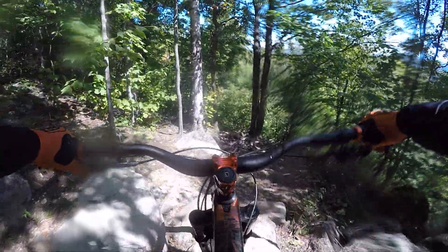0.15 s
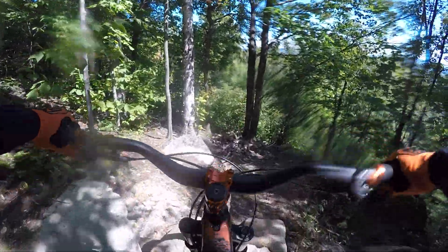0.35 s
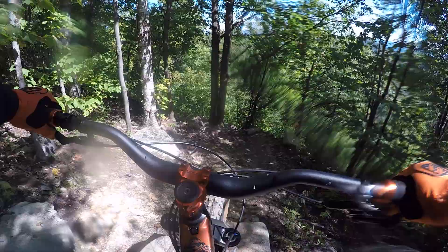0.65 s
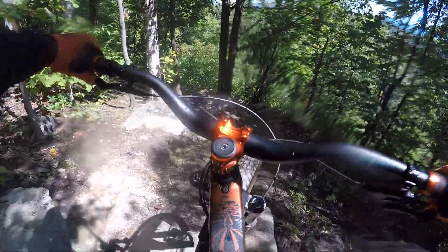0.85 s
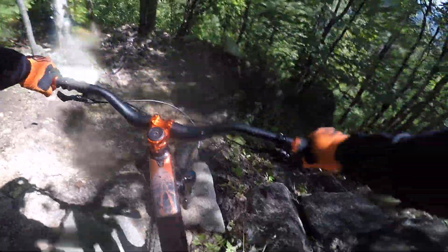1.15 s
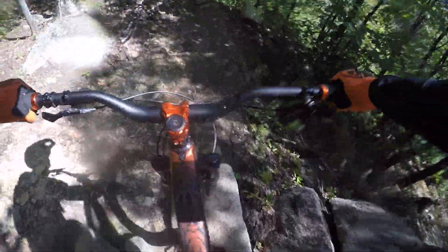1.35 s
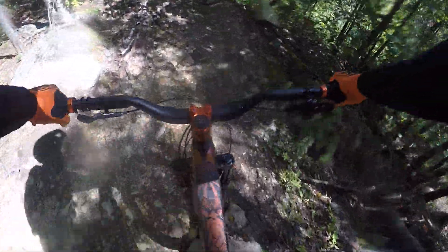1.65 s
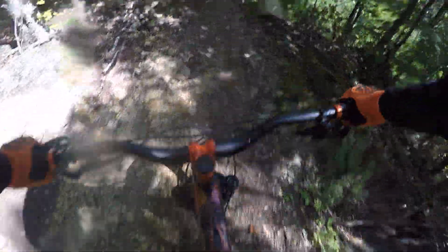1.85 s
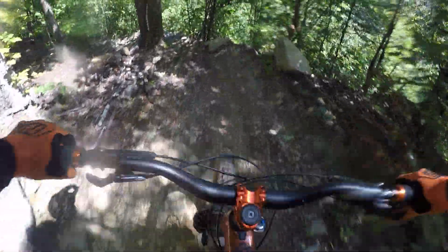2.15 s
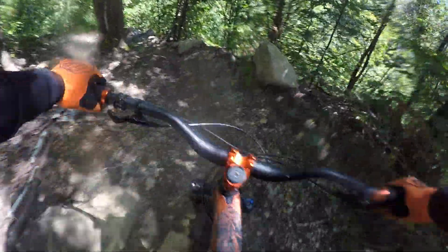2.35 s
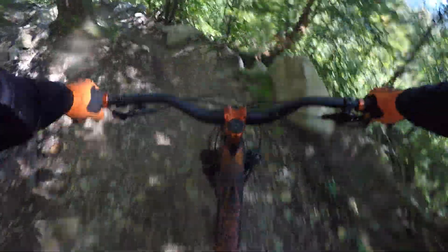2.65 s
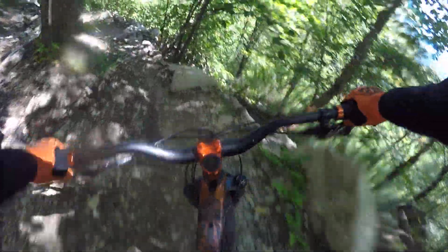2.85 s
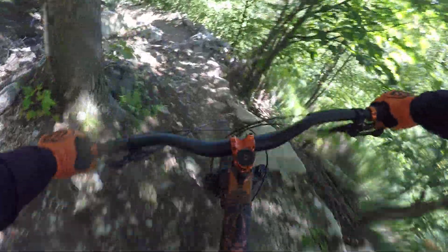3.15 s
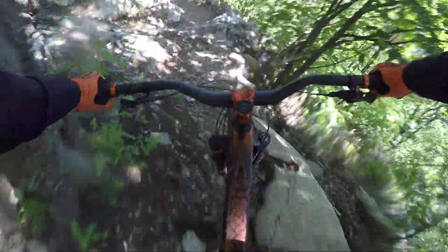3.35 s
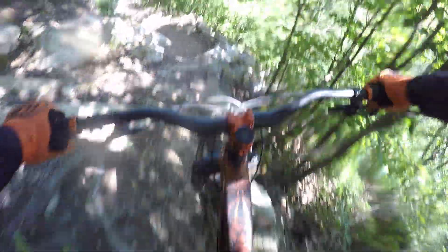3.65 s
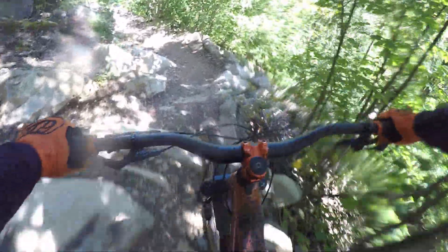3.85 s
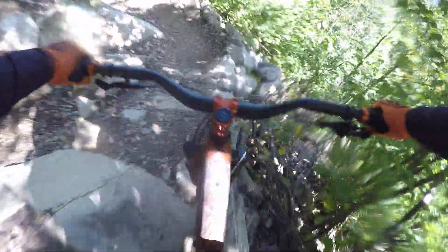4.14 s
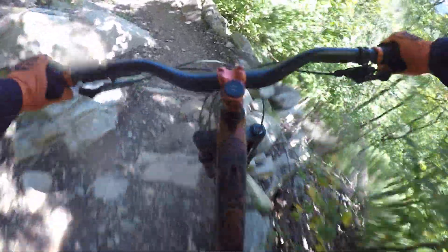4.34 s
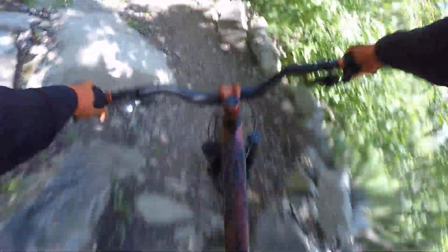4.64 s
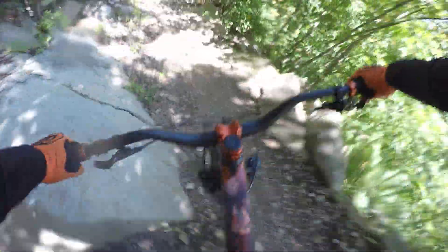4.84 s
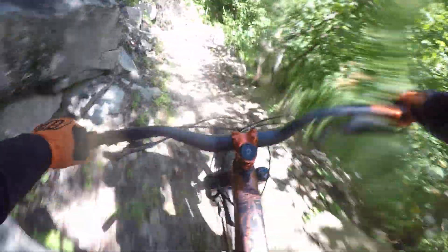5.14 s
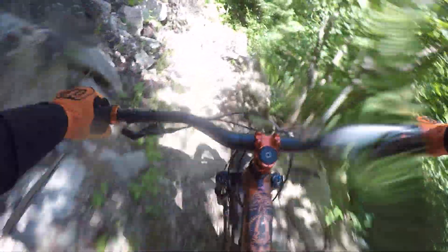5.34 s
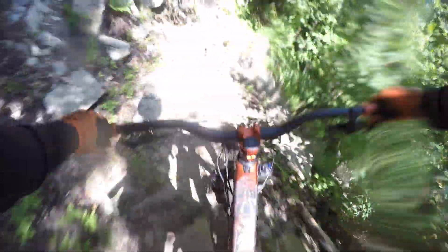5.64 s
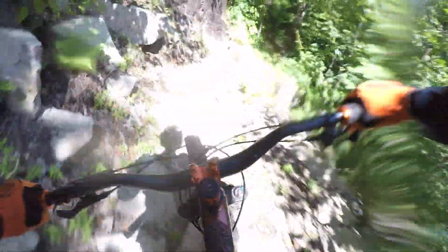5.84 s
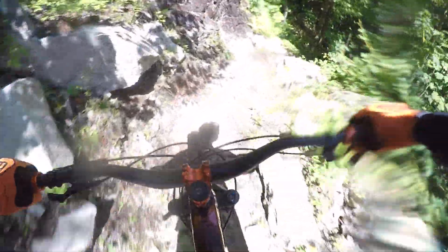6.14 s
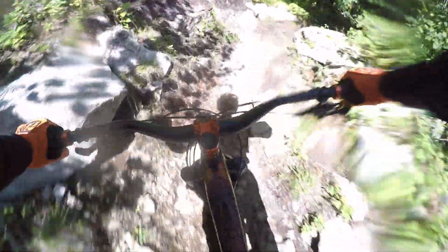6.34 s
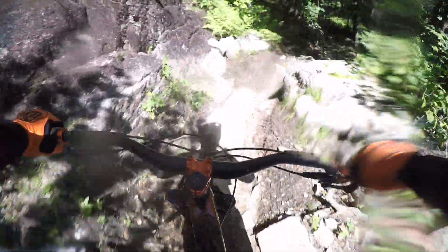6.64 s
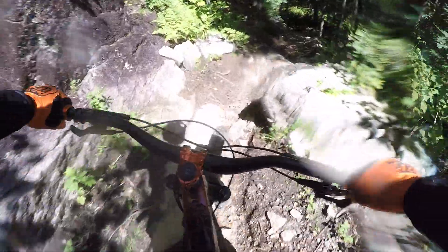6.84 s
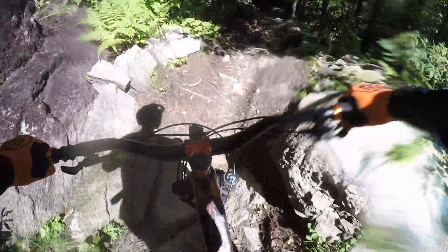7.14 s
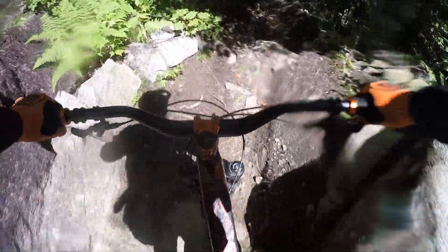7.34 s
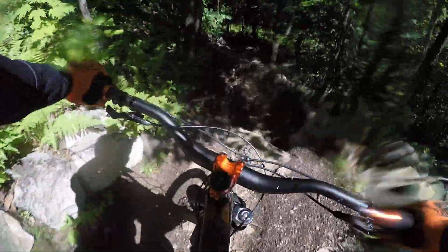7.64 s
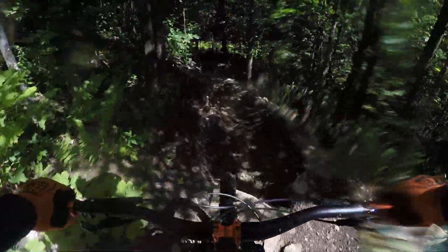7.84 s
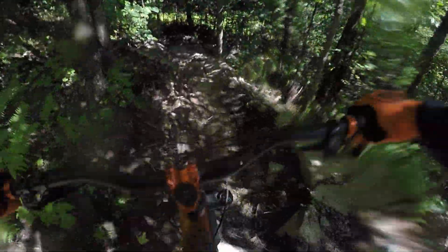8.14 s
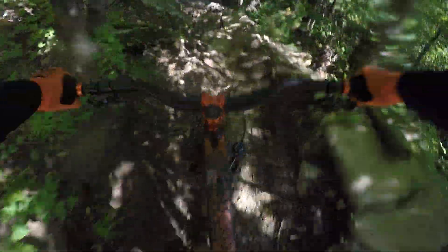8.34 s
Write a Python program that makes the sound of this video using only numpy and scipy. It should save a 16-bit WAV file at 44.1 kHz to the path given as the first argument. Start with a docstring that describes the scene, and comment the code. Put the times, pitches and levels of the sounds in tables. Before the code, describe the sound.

Wind rumbles and flutters on a microphone worn on the chest as a mountain bike crosses rocks and roots. Close hollow knocks and bright chain ticks ride over gritty tyre crunch and dragging disc brakes that squeal in short, piercing grabs. The brakes release briefly early on, then return. The rattling builds to a peak around halfway, then deep surges and a run of squeals lead to a final heavy swell.

```python
"""A mountain bike on a rocky forest trail, heard by a small camera strapped to the rider's chest.
From the start wind buffets the microphone, tyres crunch on grit and brake pads rub the disc. Frame
and chain clack, a low thump rings the camera housing, and the pads grip and slip in thin squeals.
The brake lets go at 1 s and is back by 1.7 s. The clatter is hardest near 5 s; deep swells of wind
rumble and a run of squeals follow, and the ride ends on one more big swell at 8.5 s."""
import sys
import numpy as np
from scipy.fft import rfft, irfft, next_fast_len
from scipy.io import wavfile
from scipy.ndimage import uniform_filter1d, map_coordinates

SR = 44100
rng = np.random.default_rng(int(sys.argv[2]) if len(sys.argv) > 2 else 0)


def dump(signal):
    """Clip the signal to [-1, 1] and save it as 16-bit WAV at the path in sys.argv[1]."""
    limited = np.clip(np.atleast_2d(signal).T, -1, 1)
    pcm = np.round(limited * 32767).astype(np.int16)
    wavfile.write(sys.argv[1], SR, pcm)


N = 374409


def amp(db):
    """Gain of a level in dB."""
    return 10 ** (np.asarray(db) / 20)


def unit(x):
    """x scaled to rms 1."""
    return x / np.sqrt(np.mean(x ** 2) + 1e-20)


def curves(rows):
    """Automation lanes: one value per sample for each column after the time."""
    times, *columns = np.transpose(rows)
    return [np.interp(np.arange(N) / SR, times, column) for column in columns]


def wobble(rate):
    """A smooth random modulator, rate knots a second."""
    knots = rng.standard_normal(int(N * rate / SR) + 4)
    return map_coordinates(knots, [np.arange(N) * rate / SR])


def filtered(x, response):
    """x through a complex frequency response."""
    size = next_fast_len(len(x) + 8192)
    return irfft(rfft(x, size) * response(np.fft.rfftfreq(size, 1 / SR)), size)[:len(x)]


def coloured(x, eq):
    """x through an EQ curve drawn on a log frequency axis, at rms 1."""
    hz, db = np.transpose(eq)
    return unit(filtered(x, lambda f: amp(np.interp(np.log(f + 1), np.log(hz + 1), db))))


def mode(f, centre_hz, width_hz):
    """One resonance, gain 1 at its centre."""
    return 1j * f * width_hz / (centre_hz ** 2 - f * f + 1j * f * width_hz)


def gritty(rate, spread_db, share):
    """Noise with rate sharp grains a second, which carry the given share of the power."""
    hits = rng.random(N) < rate / SR
    grains = hits * rng.standard_normal(N) * amp(spread_db * rng.random(N))
    return np.sqrt(share) * unit(grains) + np.sqrt(1 - share) * rng.standard_normal(N)


# Fader ride of the deep rumble: (time [s], level [dB])
RUMBLE_LEVEL = [(0.0, -35.5), (0.4, -26.5), (0.85, -34.5), (1.06, -25), (1.18, -38), (1.3, -14),
                (1.68, -29), (2.08, -13), (2.15, -38), (2.36, -18.5), (2.51, -26), (2.53, -11.5),
                (2.65, -16), (2.72, -29), (2.88, -25.5), (3.33, -29), (3.59, -14.5), (3.74, -26.5),
                (3.81, -18), (4.16, -25), (4.4, -17), (4.45, -22), (4.96, -10.5), (5.22, -23.5),
                (5.75, -13.5), (6.05, -20), (6.1, -31.5), (6.27, -19.5), (6.31, -44), (6.41, -5),
                (6.46, -20), (6.74, -17.5), (7.0, -24.5), (7.07, -15), (7.38, -22.5), (7.52, -10),
                (7.57, -24), (7.78, -11), (8.35, -28.5), (8.49, -8)]
# Sub-heavy EQ of the rumble: (frequency [Hz], relative gain [dB])
RUMBLE_EQ = [(4.7, 10.5), (8.0, -5.5), (21, 4.5), (32, 4.5), (110, -21), (140, -22.5), (240, -120)]

def wind_rumble():
    """Air and strap jolts push the microphone in a deep heave that surges at random."""
    deep = coloured(rng.standard_normal(N), RUMBLE_EQ)
    power = np.abs(uniform_filter1d(deep ** 2, size=5000))
    deep /= power ** 0.4 + 0.054  # the membrane's travel evens out the heave
    surges = amp(2.5 * wobble(rate=13))
    return amp(curves(RUMBLE_LEVEL)[0]) * unit(surges * deep)


# How hard the bike shakes; it also drives the tyres: (time [s], flutter level [dB])
SHAKE_LEVEL = [(0, -38), (.12, -51.5), (.6, -54), (.8, -49), (.92, -53), (1.14, -50.5), (1.22, -38),
               (1.34, -34.5), (1.47, -50.5), (1.74, -50.5), (1.82, -38.5), (1.9, -44.5), (1.96, -35.5),
               (2.08, -41.5), (2.17, -46), (2.45, -48), (2.57, -38.5), (2.75, -50.5), (3.33, -47.5),
               (3.55, -38.5), (3.85, -39.5), (3.95, -47), (4.15, -37.5), (4.5, -44.5), (4.8, -32.5),
               (4.88, -33), (4.95, -33.5), (5.1, -38), (5.2, -41.5), (5.45, -43.5), (5.55, -36),
               (5.75, -36), (6.1, -42.5), (6.3, -45.5), (6.55, -34.5), (6.85, -49.5), (7.05, -41),
               (7.3, -39.5), (7.55, -40), (7.8, -37), (8.1, -44.5), (8.33, -50), (8.49, -29.5)]
# Low-mid EQ of the flutter: (frequency [Hz], relative gain [dB])
FLUTTER_EQ = [(50, -74), (80, -33), (110, -7.5), (190, -8), (290, -9), (400, -18), (700, -27.5),
              (1500, -62.5)]

def flutter():
    """Buffeting above the rumble: a lumpy flutter that swells as the bike shakes."""
    lumps = amp(0.72 * wobble(13) + 3.7 * wobble(35))
    air = coloured(rng.standard_normal(N), FLUTTER_EQ)
    return amp(curves(SHAKE_LEVEL)[0]) * unit(lumps * air)


def gravel(rate, centre_hz, spread, decay_cycles, spread_db):
    """Loose stones under the knobs: short damped pings of scattered pitch and size."""
    count, n = int(rate * N / SR), np.arange(400)
    starts = (rng.random(count) * N).astype(int)
    pitch, size = rng.standard_normal((2, count, 1))
    hz = np.clip(centre_hz * np.exp(spread * pitch), 300, 9000)
    turns = hz * n / SR
    pings = amp(spread_db * size) * np.sin(2 * np.pi * turns) * turns * np.exp(-turns / decay_cycles)
    return unit(np.bincount((starts[:, None] + n).ravel(), pings.ravel())[:N])


TYRE_DB, CALM_SHAKE_DB = -47, -40.5  # the tyre fader sits at TYRE_DB for this much shaking

def tyre_level():
    """The tyre fader in dB: the harder the bike shakes, the higher it rides."""
    return TYRE_DB + 0.92 * (curves(SHAKE_LEVEL)[0] - CALM_SHAKE_DB)


# EQ of rubber crunching on grit: (frequency [Hz], relative gain [dB])
CRUNCH_EQ = [(200, -21), (400, 5.5), (700, -3), (1300, -5.5), (2500, -2.5), (4000, -8.5), (6000, -51),
             (10000, -67)]

def tyres(bumps):
    """Tyres crunch on grit in spurts; loose stones come forward as the ride gets rougher."""
    level_db = tyre_level()
    spurts = amp(1.2 * bumps + 1.6 * wobble(70))
    crunch = unit(spurts * coloured(gritty(rate=900, spread_db=8, share=0.21), CRUNCH_EQ))
    stones = gravel(rate=500, centre_hz=1294, spread=0.636, decay_cycles=1.7, spread_db=6)
    stones_db = 0.19 * (level_db - TYRE_DB)
    return amp(level_db - 6) * (crunch + amp(stones_db) * stones)


# Fader ride of the rolling hiss: (time [s], level [dB])
HISS_FADER = [(0, -63), (.3, -68.5), (.7, -57.5), (.9, -69), (1.15, -61), (1.9, -66.5), (2.4, -63.5),
              (2.75, -60.5), (3.6, -56), (4.2, -60.5), (4.96, -50.5), (5.5, -56), (7, -56), (7.5, -53.5),
              (8.15, -60), (8.49, -56.5)]
# EQ of the hiss, with a bright peak: (frequency [Hz], relative gain [dB])
HISS_EQ = [(2500, 2), (4500, 1.5), (6500, -0.5), (7450, 6), (8300, -6), (11000, -10.5), (14500, -13),
           (15300, -48)]

def rolling_hiss(bumps):
    """An airy hiss that flickers with the same bumps as the tyres."""
    flicker = amp(1.4 * bumps + 1.3 * wobble(60))
    hiss = coloured(rng.standard_normal(N), HISS_EQ)
    return amp(curves(HISS_FADER)[0]) * unit(flicker * hiss)


# Fader ride of the pads on the disc: (time [s], level [dB])
RUB_LEVEL = [(0, -54), (.15, -62), (.32, -55), (.6, -54.5), (.85, -57), (1, -92), (1.5, -80), (1.66, -53.5),
             (2, -53.5), (2.6, -51.5), (2.9, -47.5), (3.9, -48.5), (4.5, -49.5), (5.3, -50), (5.8, -46.5),
             (6.7, -55.5), (7.2, -51), (7.7, -51), (8.1, -55.5), (8.2, -48.5), (8.49, -54)]
# Low modes of the brake disc: (frequency [Hz], bandwidth [Hz], relative gain [dB])
DISC_MODES = [(1172, 18, 11), (1390, 85, 11), (1595, 117, 7), (2368, 73, 2), (2932, 49, 4), (3890, 76, -3),
              (4900, 25, -48)]

def brake_rub():
    """The pads drag on the disc and catch its low modes in short chirps."""
    drag = gritty(rate=400, spread_db=13, share=0.41)
    grip_db = 1.9 * wobble(40)
    disc = np.zeros(N)
    for hz, width_hz, db in DISC_MODES:
        chirp_db = 8000 / (hz + 400) * wobble(50)  # lower modes swing further in level
        disc += filtered(amp(db + grip_db + chirp_db) * drag, lambda f: mode(f, hz, width_hz))
    return amp(curves(RUB_LEVEL)[0]) * unit(disc)


def whine():
    """A faint, narrow, steady whine high in the background."""
    return amp(-79) * unit(filtered(rng.standard_normal(N), lambda f: mode(f, 5050, 60) ** 2))


def contacts(rows, relative_width, crunch_eq, crunch_db, fall_db):
    """Rattling bursts, each ringing at one pitch over a wider crunch; fall_db down after its length."""
    out, t = np.zeros(N + SR), np.arange(SR // 6) / SR
    for start, db, hz, length in rows:
        length = max(length, 0.002)
        attack = 1 - np.exp(-t / (0.00012 + 0.085 * length))
        decay = amp(-fall_db * (t / length) ** 2.3)
        noise = rng.standard_normal(len(t))
        rattle_db = 4 * np.repeat(rng.standard_normal(len(t) // 50 + 1), 50)[:len(t)]
        burst = filtered(noise * amp(rattle_db) * attack * decay,
                         lambda f: mode(f, hz, relative_width * hz) ** 2 + amp(crunch_db) * crunch_eq(f))
        rms = np.sqrt(np.sum(burst ** 2) / (length * SR))
        out[round(start * SR):][:len(t)] += amp(db) * burst / rms
    return out[:N]


def small_clacks(rate, ring_hz, length_s):
    """Cues for lesser knocks at scattered moments, around 3 dB under the tyre fader."""
    timing, strength, pitch, stretch = rng.standard_normal((int(N / SR * rate), 4)).T
    starts = np.clip((np.arange(len(timing)) + 0.5 + 0.4 * timing) / rate, 0, (N - 1) / SR)
    db = tyre_level()[(starts * SR).astype(int)] - 3 + 2 * strength
    return list(zip(starts, db, ring_hz * np.exp(0.24 * pitch), length_s * np.exp(0.34 * stretch)))


# Hits of frame and stones: (time [s], level [dB], ring pitch [Hz], length [s])
FRAME_HITS = [(0.007, -41, 1210, 0.022), (0.225, -42.5, 1250, 0.0055), (0.259, -44, 3000, 0.0037),
              (0.83, -53, 1510, 0.039), (0.298, -48, 2880, 0.0041), (0.405, -53.5, 4300, 0.016),
              (1.226, -47, 1720, 0.025), (1.273, -47, 1450, 0.03), (1.295, -42.5, 1640, 0.026),
              (1.185, -51, 1510, 0.035), (1.36, -50, 1270, 0.012), (1.41, -52, 1480, 0.028),
              (1.856, -43, 1770, 0.0099), (1.939, -44, 1830, 0.032), (2.548, -48, 980, 0.028),
              (2.694, -45, 1490, 0.026), (2.743, -29.5, 1570, 0.0041), (2.789, -46, 1500, 0.032),
              (2.18, -49, 1150, 0.024), (2.31, -52, 1170, 0.018), (2.41, -47, 1200, 0.013),
              (2.965, -47, 1480, 0.021), (2.99, -47, 1350, 0.016), (3.165, -48, 1570, 0.011),
              (3.32, -49, 1190, 0.017), (3.741, -43, 1300, 0.017), (3.851, -43.5, 1390, 0.014),
              (0.465, -60, 4640, 0.018), (6.456, -40, 750, 0.011), (7.03, -46.5, 1600, 0.018),
              (3.044, -44, 1580, 0.018), (3.266, -41, 1520, 0.0075), (3.478, -36.5, 1450, 0.0075),
              (3.505, -40.5, 1770, 0.011), (3.522, -40, 1470, 0.012), (3.678, -44, 1390, 0.013),
              (3.774, -43, 3220, 0.0057), (3.936, -41, 1500, 0.011), (3.95, -31.5, 1460, 0.0017),
              (4.151, -40.5, 3850, 0.011), (4.181, -40.5, 4000, 0.016), (4.232, -34, 1510, 0.031),
              (4.355, -43, 1550, 0.0077), (4.441, -39.5, 1440, 0.01), (4.477, -41.5, 3120, 0.014),
              (4.555, -37, 1200, 0.0062), (4.668, -36, 1370, 0.0052), (4.715, -38, 3120, 0.033),
              (4.779, -25, 980, 0.0025), (4.791, -28.5, 1600, 0.0066), (4.806, -29.5, 1160, 0.0062),
              (4.822, -28.5, 1840, 0.0035), (4.928, -31, 3120, 0.016), (4.942, -29, 1480, 0.0041),
              (4.962, -35.5, 3500, 0.012), (5.004, -35, 1470, 0.0067), (5.045, -38, 730, 0.0068),
              (5.08, -41.5, 1000, 0.044), (5.085, -43.5, 3180, 0.02), (5.168, -40, 1490, 0.018),
              (5.303, -42.5, 2590, 0.0081), (5.354, -38.5, 1550, 0.005), (5.458, -39.5, 1490, 0.008),
              (5.538, -31, 1300, 0.007), (5.647, -36, 1030, 0.025), (5.715, -27, 1500, 0.0026),
              (5.753, -34, 1610, 0.0066), (5.889, -37, 2290, 0.026), (6.205, -44.5, 2320, 0.018),
              (6.3, -40.5, 1380, 0.018), (6.39, -40, 2140, 0.029), (6.427, -34.5, 880, 0.0094),
              (6.536, -33.5, 2550, 0.0095), (6.605, -42, 1550, 0.0052), (6.642, -30.5, 1900, 0.013),
              (6.643, -36, 1040, 0.011), (7.063, -40, 3200, 0.008), (7.105, -37.5, 895, 0.0075),
              (7.172, -35.5, 2330, 0.0076), (7.221, -41, 1830, 0.028), (7.326, -38, 1400, 0.009),
              (7.411, -35, 2460, 0.023), (7.525, -39, 1820, 0.0054), (7.671, -36.5, 1700, 0.014),
              (7.747, -36.5, 1650, 0.0035), (7.843, -36, 1530, 0.011), (8.004, -44, 2070, 0.043),
              (8.052, -43.5, 2360, 0.0096), (8.158, -41.5, 2090, 0.022), (8.18, -44.5, 1400, 0.016),
              (8.35, -43.5, 1490, 0.0036), (8.376, -39, 1370, 0.015), (8.405, -41, 3140, 0.044)]

def frame_clacks():
    """Frame and stones knock with a hollow ring as the bike crosses rocks and roots."""
    hits = FRAME_HITS + small_clacks(rate=4, ring_hz=1610, length_s=0.016)
    return contacts(hits, relative_width=0.23, crunch_db=-3, fall_db=5,
                    crunch_eq=lambda f: mode(f, 804, 2170) ** 2 * mode(f, 1180, 4400))


# Hits of chain and cables: (time [s], level [dB], ring pitch [Hz], length [s])
CHAIN_HITS = [(0.135, -47, 6940, 0.0022), (0.42, -58, 7400, 0.003), (0.675, -55, 7400, 0.0022),
              (0.241, -53, 7300, 0.0049), (1.238, -47.5, 4930, 0.0043), (1.273, -48, 4960, 0.0055),
              (1.82, -40.5, 7300, 0.0021), (2.876, -53.5, 7400, 0.012), (3.367, -43.5, 6200, 0.0034),
              (3.419, -41, 7300, 0.0049), (3.565, -51.5, 7000, 0.019), (3.695, -52.0, 7060, 0.008),
              (3.949, -51, 6460, 0.0032), (4.153, -48, 7300, 0.004), (4.225, -51, 7350, 0.006),
              (4.233, -46, 4600, 0.0045), (4.247, -47, 7010, 0.01), (4.485, -42.5, 6250, 0.005),
              (4.732, -43, 7350, 0.0037), (4.823, -42, 5260, 0.0019), (4.943, -45, 4600, 0.0061),
              (4.966, -40, 5300, 0.0067), (4.983, -41, 6270, 0.008), (5.01, -43.5, 5150, 0.0057),
              (5.466, -47.5, 5770, 0.005), (5.651, -42.5, 4850, 0.017), (5.677, -50, 7270, 0.0049),
              (5.829, -47.5, 7300, 0.011), (5.994, -46, 4650, 0.0088), (6.374, -42.5, 5640, 0.015),
              (6.431, -45, 6300, 0.0032), (6.535, -50, 6900, 0.014), (6.564, -48, 7440, 0.008),
              (7.063, -42.5, 4550, 0.0059), (7.314, -53, 6660, 0.0081), (7.356, -50, 4660, 0.005),
              (7.678, -52, 5390, 0.012), (7.701, -46.5, 7450, 0.0073), (7.767, -47, 7500, 0.0048),
              (7.841, -51.5, 4600, 0.018), (7.933, -52, 7220, 0.016), (8.349, -52, 6140, 0.006)]

def chain_ticks():
    """Chain and cables strike in thin, bright ticks."""
    return contacts(CHAIN_HITS, relative_width=0.096, crunch_db=-7, fall_db=3,
                    crunch_eq=lambda f: mode(f, 5800, 4700) ** 2)


# Low thumps and single deep swells of the wind rumble: (time [s], level [dB], pitch [Hz], ring send [dB])
LOW_PULSES = [(0.227, -12, 147, -10.5), (0.85, -27, 100, -3), (1.022, -27.5, 90, -47),
              (1.191, -31, 169, -8), (1.228, -16.5, 76.5, -22), (1.781, -33, 91, -24),
              (2.238, -21, 127, -29), (2.527, -24, 70.6, -22), (3.509, -30, 95, -18),
              (3.803, -23, 204, -15.5), (4.032, -24, 110, -12), (4.242, -16, 204, -21),
              (4.626, -24, 101, -33), (4.779, -12, 91, -11), (4.921, -18, 129, -31), (5.047, -34.5, 83, 4),
              (5.088, -27, 99, -2), (5.48, -13, 84, -35), (5.509, -11.5, 80, -31), (5.654, -15, 91, -13),
              (5.692, -7, 71, -43), (5.753, -17, 242, -22), (5.884, -24, 87, -22), (6.358, -20, 132, -35),
              (6.425, -28, 110, -17), (6.5, -12.5, 67.4, -48), (7.022, -14.5, 77.4, -42),
              (7.108, -29, 90, -5.5), (7.41, -18, 100, -15), (7.468, -16.5, 74.6, -20),
              (7.67, -17, 87.5, -26), (8.01, -37, 90, 3), (8.159, -25, 158, -20), (8.459, -4, 61.7, -29)]
# Modes of the camera housing: (frequency [Hz], gain [dB], time to fall 60 dB [s])
HOUSING_MODES = [(452, 6, 0.027), (557, -8, 0.023), (316, 5.5, 0.022)]

def thumps_and_swells():
    """Low thumps and single deep swells of the wind rumble; the sharper ones ring the camera housing."""
    out, t = np.zeros(N + SR), np.arange(SR // 6) / SR
    attack = 1 - np.exp(-t / 0.0012)
    for start, db, hz, ring_db in LOW_PULSES:
        body = -np.sin(2 * np.pi * hz * t) * np.exp(-1.3 * hz * t)
        ring = sum(amp(mode_db + rng.normal(0, 0.93) - 60 * t / t60) * np.sin(2 * np.pi * mode_hz * t)
                   for mode_hz, mode_db, t60 in HOUSING_MODES)
        pulse = body / np.abs(body).max() + amp(ring_db) * ring
        out[round(start * SR):][:len(t)] += amp(db) * pulse * attack
    return out[:N]


# Grabs of the pads: (centre time [s], level [dB], pitch [Hz], hold [s])
PAD_GRABS = [(0.396, -45.5, 12850, 0.023), (.45, -63, 12900, .02), (0.544, -48.5, 13300, .03),
             (.61, -60, 13400, .05), (0.793, -51, 13230, 0.018), (0.826, -46, 13100, 0.017),
             (1.764, -61, 13200, 0.018), (2.07, -46, 13100, .01), (2.678, -59, 12900, .01),
             (2.734, -39, 12960, 0.011), (2.788, -37, 13100, 0.037), (2.817, -41, 13450, .015),
             (2.91, -43, 13250, .07), (3.008, -38.5, 13250, 0.058), (3.093, -66, 13200, 0.043),
             (3.28, -68, 13000, .01), (3.35, -65, 13100, 0.028), (3.398, -50, 12900, 0.012),
             (5.39, -46.5, 12960, 0.007), (5.463, -39, 13160, 0.013), (5.845, -41, 13400, 0.0087),
             (5.943, -40, 13300, 0.0077), (5.991, -40, 13450, .01), (6.018, -48, 13050, .04),
             (6.114, -49, 13100, .015), (6.165, -49, 13300, .04), (6.256, -45.5, 13100, 0.045),
             (6.348, -38, 13250, 0.067), (6.489, -42, 13600, 0.061), (6.582, -42, 13550, 0.041),
             (6.68, -44, 13800, 0.0093), (6.723, -45, 13700, 0.016), (6.775, -49, 13900, 0.0097),
             (7.27, -58, 13300, .04), (7.316, -43, 13200, .02), (7.551, -54, 13700, 0.013),
             (7.6, -64, 13700, .03), (8.225, -67, 13400, .015)]
# Pitch jitter of the squeal, wider as the bike gathers speed: (time [s], depth [Hz])
SQUEAL_JITTER = [(0, 45), (1, 45), (2, 150), (8.49, 190)]

def brake_squeal():
    """The pads grip and slip at a high disc mode in short grabs; the pitch glides from grab to grab."""
    attack_db_per_s, release_db_per_s = 1200, 800
    tail_db, tail_db_per_s = -17.5, 120  # a faint ring lingers after each grab
    t = np.arange(N) / SR
    chatter = unit(amp(3.5 * wobble(200) + 2 * wobble(30)))
    level_db = np.full(N, -200.0)
    for centre, db, _, hold in PAD_GRABS:
        before = np.maximum(centre - hold / 2 - t, 0)
        after = np.maximum(t - centre - hold / 2, 0)
        release_db = np.maximum(-release_db_per_s * after, tail_db - tail_db_per_s * after)
        level_db = np.maximum(level_db, db - attack_db_per_s * before + release_db)
    pitch_hz = curves(PAD_GRABS)[1] + curves(SQUEAL_JITTER)[0] * wobble(500)
    tone = np.sqrt(2) * np.sin(2 * np.pi * np.cumsum(pitch_hz) / SR)
    return amp(level_db) * chatter * tone


def scene():
    """A dry mono mix: everything is within arm's reach."""
    buffeting = wind_rumble() + flutter()
    bumps = wobble(rate=25)
    bed = buffeting + tyres(bumps) + rolling_hiss(bumps) + brake_rub() + whine()
    return (bed + frame_clacks() + chain_ticks() + thumps_and_swells() + brake_squeal())[None]


def record(dry):
    """The camera keeps nothing above its band limit."""
    return filtered(dry[0], lambda hz: hz < 15364)[None]


dry = scene()
out = record(dry)
dump(out)
```